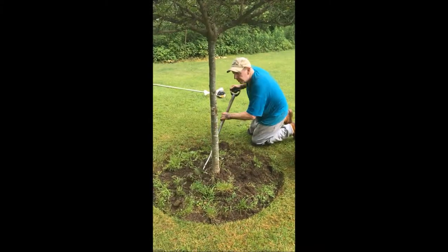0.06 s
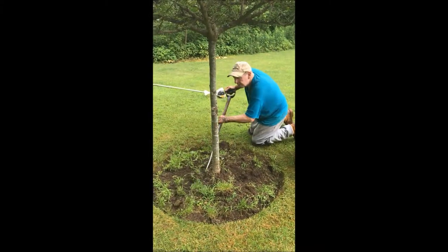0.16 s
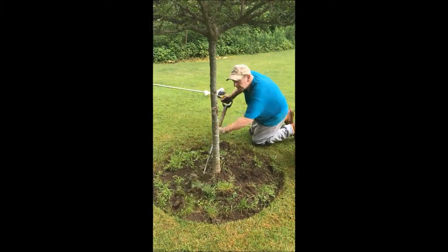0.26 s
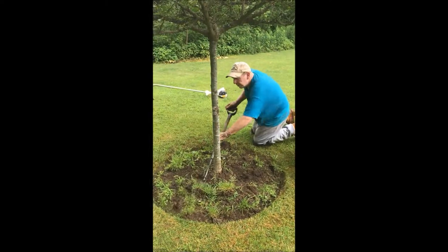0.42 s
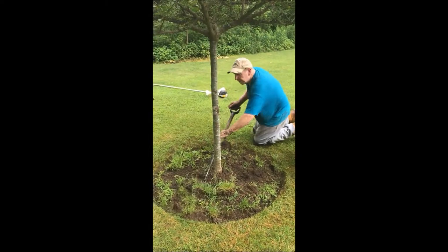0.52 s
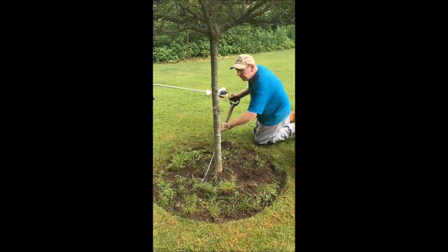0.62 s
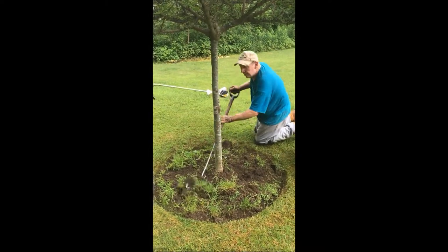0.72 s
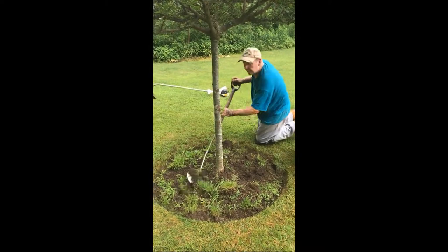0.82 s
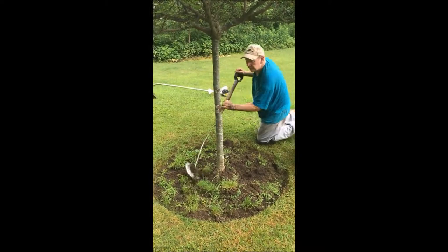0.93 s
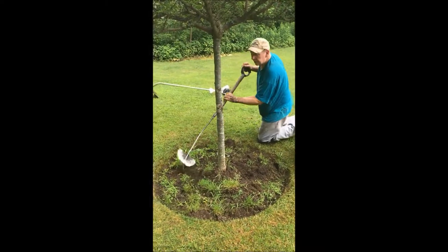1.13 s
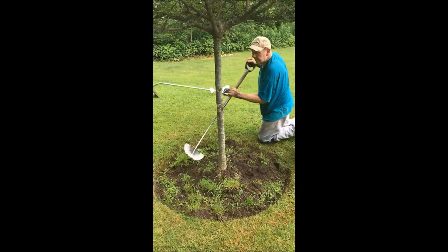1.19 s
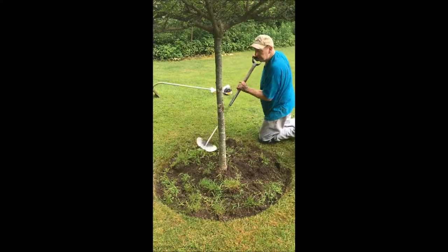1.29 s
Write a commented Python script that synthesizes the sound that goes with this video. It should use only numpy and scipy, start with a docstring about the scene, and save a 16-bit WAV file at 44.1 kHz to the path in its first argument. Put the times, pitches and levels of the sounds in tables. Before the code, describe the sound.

A long-handled steel edger jabs crunching into turf, snapping roots, then scrapes back out of soil

```python
"""Lawn edger jabbed into turf

A long-handled steel edger is jabbed into turf, then drawn out: soil grinds as trains of tiny fractures,
roots crunch in short filtered noise bursts and snap as damped knocks, the ground thuds as a sinking sine.
Grass brushes the steel, the blade rings as a set of modes, and grit ticks on it once freed.
Behind lie faint scatter, a low wavering hum of sines and outdoor air of coloured noise."""
import sys
import numpy as np
from scipy import signal
from scipy.fft import rfft, irfft
from scipy.io import wavfile
from scipy.ndimage import map_coordinates

SR = 44100
rng = np.random.default_rng(int(sys.argv[2]) if len(sys.argv) > 2 else 0)


def wrap_up_sound(samples):
    """Save the sound to the file named by the first command line argument, as 16-bit audio."""
    columns = np.atleast_2d(samples).T
    # keep every value between -1 and 1, then stretch to whole-number steps
    tamed = np.clip(columns, -1, 1)
    steps = np.round(tamed * 32767).astype(np.int16)
    wavfile.write(sys.argv[1], SR, steps)


N = 59535

# roots and clods giving way, and the low row at 0.294 s a second bounce of the ground: (time [s], rise [s],
# decay [s], level [dB], body pitch [Hz], body width [Hz], # crackle over body [dB], dull thump over body [dB])
CRUNCHES = [(0.01, 0.0033, 0.0052, -59, 1470, 1510, 10, -32),
            (0.1659, 0.00059, 0.0022, -42.5, 3600, 3000, -1.5, -26),
            (0.187, 0.0005, 0.0024, -38.5, 1500, 1500, -13, -32),
            (0.197, 0.0028, 0.00095, -34.5, 1070, 400, -10, -38),
            (0.2159, 0.0015, 0.0022, -29.5, 880, 560, 2.5, -9),
            (0.24, 0.0021, 0.003, -47, 1180, 1200, 7, -1),
            (0.256, 0.00055, 0.002, -24.5, 1050, 1100, 0, -11),
            (.259, 0.00092, 0.0048, -25, 857, 1000, -9, -20.5),
            (0.275, 0.0025, 0.0039, -28.5, 1150, 656, -7.5, -12),
            (0.278, 0.0038, 0.0033, -28.5, 4100, 1300, -7, -20),
            (0.291, 0.00062, 0.0045, -32, 1110, 890, -10, -14),
            (.294, 0.0041, 0.0078, -38.5, 170, 109, -3.5, -26),
            (0.3156, 0.00051, 0.0073, -33, 1780, 1010, -20, -7),
            (0.3243, 0.00075, 0.0021, -45, 2200, 1790, 5, -16),
            (0.337, 0.00035, 0.0079, -27, 1600, 1090, -31, -50),
            (0.341, 0.0022, 0.0048, -23, 2160, 1110, -1.5, -14),
            (0.3497, 0.00063, 0.0034, -26.5, 2400, 950, -6.5, -12),
            (0.7047, .0005, 0.0022, -41, 1134, 540, -14, -14),
            (0.745, 0.0038, 0.0032, -43, 1240, 1030, -10, -26),
            (0.766, 0.0014, 0.0048, -38, 1520, 800, -7, -44),
            (.793, 0.0035, 0.0084, -47, 535, 150, 1.5, -3),
            (.797, 0.0047, 0.0023, -38.5, 1140, 744, -1.5, -44),
            (1.172, 0.0081, 0.011, -59, 270, 130, -22, -14)]
# colour of tearing fibres: (frequency [Hz], level [dB])
CRACKLE_COLOUR = [(100, -33), (450, -15), (800, 4.5), (2500, 1.5), (4200, 0), (5300, -3.5), (9200, -4.5),
                  (10200, -16.5), (12500, -10), (16000, -18)]
# single sharp snaps of thick roots: (time [s], peak [dB], pitch [Hz], decay [s])
SNAPS = [(.2172, -21, 900, .0012), (.2571, -13, 850, .001), (.2574, -25, 5000, .001),
         (.3444, -24, 800, .0018), (.351, -15.5, 2200, 0.00067), (.7047, -30.5, 1000, .0011)]
# soil grinding on the blade going in, and coming out: (time [s], level [dB])
PUSH_LEVEL = [(.09, -69), (.135, -52), (.155, -66.5), (.175, -53), (.185, -45), (.201, -43), (.212, -48),
              (.224, -40), (.234, -49.5), (.253, -51), (.264, -30.5), (.272, -44.5), (.288, -34.5),
              (.31, -43), (.332, -43), (.354, -51), (.366, -54), (.39, -62)]
PULL_LEVEL = [(.56, -93), (.59, -67), (.635, -83), (.66, -57.5), (.695, -64.5), (.722, -52.5), (.745, -42),
              (.76, -49), (.775, -43.5), (.79, -56), (.806, -59), (.816, -68), (.826, -53.5), (.85, -79)]
# colours of the two grinds: (frequency [Hz], level [dB])
PUSH_COLOUR = [(100, -14), (300, -19), (490, -24.5), (750, 0.5), (1100, -2.5), (1600, -6), (2400, -5),
               (4400, -5), (5300, -6.5), (9000, -13.5), (16000, -17.5)]
PULL_COLOUR = [(150, -20), (450, -16), (900, -3), (1250, -7), (1500, 3), (1900, -2.5), (2250, -11.5),
               (2700, -5.5), (5000, -15), (9000, -15.5), (16000, -25)]
# grass brushing the steel: (centre time [s], Gaussian spread [s], level [dB])
BRUSHES = [(0.209, 0.0045, -41.5), (.262, 0.0024, -36.5), (0.282, 0.0051, -41), (0.587, 0.012, -57),
           (0.655, 0.032, -55), (0.733, 0.02, -56), (0.801, 0.0054, -48), (0.825, 0.0036, -48),
           (0.881, 0.016, -62), (1.025, 0.0064, -63)]
# colour of the grass: (frequency [Hz], level [dB])
GRASS_COLOUR = [(500, -29), (2000, -3.5), (4000, 3), (7000, -1.5), (9600, -0.5), (10200, -7), (12200, 0),
                (16000, -5)]
# short modes of the blade wedged in sod: (frequency [Hz], relative level [dB], t60 [s])
WEDGED_MODES = [(2290, -3, .018), (2780, -4, .018), (3680, -4, .016), (4550, 1, .012), (6900, 4, .012),
                (9080, 3, .011), (11000, 0, .011), (12500, 1, .011), (15400, 0, .013)]
# modes of the loose blade: (frequency [Hz], relative level [dB], t60 [s])
LOOSE_MODES = [(1488, -11, .05), (1728, -19, .04), (2570, -15, .35), (2730, -7, .055), (3420, -7, .045),
               (3564, -10, .08), (4231, -10, .08), (4600, -7, .09), (5630, -4, .06), (6202, -10, .045),
               (7310, -8, .055), (8130, -6, .035), (9230, -7, .075), (9750, -1, .04), (10780, -3, .05),
               (11090, -5, .04), (11580, -6, .06), (12630, -6, .035), (13800, -10, .04)]
# grit on the free blade; the landing spot favours some modes:
# (time [s], click [dB], ring [dB], favoured pitch [Hz], distance to fall 10 dB [octaves])
TICKS = [(.823, -53, -56, 3500, .25), (.881, -68, -47, 4231, .06), (0.9357, -38.5, -44, 4800, 2),
         (0.957, -75, -48, 2570, .08), (0.9656, -55, -55, 11300, .4), (1.0148, -58, -57.5, 11100, .8),
         (1.16, -57, -57, 4500, .4), (1.26, -58.5, -75, 9000, 1)]
# colour of the clicks: (frequency [Hz], level [dB])
TICK_COLOUR = [(200, -22), (600, -3), (2000, -6.5), (4000, -1), (7000, 0.5), (9600, -2.5), (10200, -5),
               (12200, -3), (16000, -12)]
# distant hum partials: (frequency [Hz], level [dB])
HUM = [(51.5, -54), (78, -59), (129, -62), (156, -65.5), (206, -73), (229, -71.5)]
# colour of outdoor air: (frequency [Hz], level [dB])
AIR_COLOUR = [(20, -27), (35, -28), (50, -1.5), (85, 1.5), (130, -4.5), (230, -8.5), (340, -14), (500, -21),
              (900, -16.5), (1500, -19.5), (3000, -23.5), (6000, -29.5), (11000, -34), (16000, -34.5)]

THUMP_HZ, THUMP_WIDTH_HZ = 316, 368
RESNAP_S = 0.0007  # mean lag of a fibre's second snap
GRAINS_PER_S, GRAIN_SPREAD_DB, GRAIN_Q = 700, 4, 3.3  # in each pitch band
LOOSENS_S, WEDGED_RING_DB, LOOSE_RING_DB = 0.4, -15, -6.5
TICK_DECAY_S = 0.0026
THUD_S, THUD_DB, THUD_RISE_S, THUD_DECAY_S = 0.2574, -30.5, 0.00083, 0.033
THUD_START_HZ, THUD_END_HZ, THUD_SAG_S = 280, 58, 0.01014
GARDEN_DB, GARDEN_START_S, GARDEN_RISE_S, GARDEN_DECAY_S = -28.5, 0.0065, 0.013, 0.22
HUM_WAVER_DB, HUM_WAVER_HZ, HUM_DRIFT_RAD, HUM_DRIFT_HZ = 3, 8.77, 0.99, 6.88
AIR_DB, AIR_SPLIT_HZ, AIR_FADE_DB_PER_S = -56, 500, 3.5
TOP_HZ = 15900


def crunches():
    """Each root tears in a cluster of fractures: body and dull thump in the sod, bright doubled crackle."""
    body, thump, crackle = 0, 0, 0
    sod, fibres = rng.standard_normal(N), grains()
    dull = resonate(rng.standard_normal(N), THUMP_HZ, THUMP_WIDTH_HZ)
    lags_s = RESNAP_S * (0.5 + rng.random(N))
    for (start, rise, decay, db, hz, width, crackle_db, thump_db), lag_s in zip(CRUNCHES, lags_s):
        env = undb(db) * burst(start, rise, decay)
        body = body + fill(resonate(env * sod, hz, width), env)
        thump = thump + undb(thump_db) * fill(env * dull, env)
        snap = env * fibres
        resnap = np.roll(snap, int(lag_s * SR))
        crackle = crackle + undb(crackle_db) * fill(snap - resnap, env)
    return body + thump + colour(crackle, CRACKLE_COLOUR)


def snaps():
    """A thick root parts at once: one abrupt, heavily damped knock."""
    out = 0
    for start, db, hz, decay in SNAPS:
        knock = np.cos(2 * np.pi * hz * (times() - start))
        out = out + undb(db) * burst(start, 2 / SR, decay) * knock
    return out


def grind(curve, tone, slip_hz, slip_db):
    """Soil grains slide past the blade in uneven slips."""
    s, db = np.array(curve).T
    level_db = np.interp(times(), s, db, left=-120, right=-120)
    env = undb(level_db + slip_db * walk(slip_hz))
    return colour(env * grains(), tone)


def grass():
    """Blades of grass swish over the steel in Gaussian swells of tiny fractures."""
    env = 0
    for centre, spread, db in BRUSHES:
        env = env + undb(db) * np.exp(-((times() - centre) / spread) ** 2 / 2)
    return colour(env * grains(), GRASS_COLOUR)


def blade(rub):
    """The steel rings with whatever rubs it: briefly while wedged, longer once loose."""
    loose = times() > LOOSENS_S
    wedged_ring = convolve_unit(rub * ~loose, ring(WEDGED_MODES))
    loose_ring = convolve_unit(rub * loose, ring(LOOSE_MODES))
    return undb(WEDGED_RING_DB) * wedged_ring + undb(LOOSE_RING_DB) * loose_ring


def ticks():
    """Grit clicks on the lifted blade, which rings freely and a little differently each time."""
    env, ringing = 0, 0
    for start, click_db, ring_db, favoured_hz, octaves in TICKS:
        env = env + undb(click_db) * burst(start, 1 / SR, TICK_DECAY_S)
        modes = []
        for hz, db, t60 in LOOSE_MODES:
            loss_db = 10 * abs(np.log2(hz / favoured_hz)) / octaves
            modes.append((hz, db - loss_db, t60))
        ringing = ringing + undb(ring_db) * np.pad(ring(modes), (int(start * SR), N))[:N]
    return colour(env * rng.standard_normal(N), TICK_COLOUR) + ringing


def thud():
    """The ground takes the blow; its pitch sinks exponentially as the blade slows."""
    age = np.maximum(times() - THUD_S, 0)
    sag = (THUD_START_HZ - THUD_END_HZ) * THUD_SAG_S * (1 - np.exp(-age / THUD_SAG_S))
    turns = THUD_END_HZ * age + sag  # integral of the sinking pitch
    return undb(THUD_DB) * burst(THUD_S, THUD_RISE_S, THUD_DECAY_S) * np.sin(2 * np.pi * turns)


def garden(x):
    """Faint scatter from trees and hedge: convolution with a decaying noise tail."""
    tail = burst(GARDEN_START_S, GARDEN_RISE_S, GARDEN_DECAY_S) * rng.standard_normal(N)
    return undb(GARDEN_DB) * convolve_unit(x, tail)


def hum():
    """Distant low partials, each wavering in level and phase."""
    out = 0
    for hz, db in HUM:
        level = undb(db + HUM_WAVER_DB * walk(HUM_WAVER_HZ))
        phase = 2 * np.pi * hz * times() + HUM_DRIFT_RAD * walk(HUM_DRIFT_HZ)
        out = out + level * unit(np.sin(phase))
    return out


def air():
    """Outdoor air: coloured noise whose hiss slowly eases while the low part holds."""
    t = times()
    noise = undb(AIR_DB) * unit(colour(rng.standard_normal(N), AIR_COLOUR))
    low = signal.sosfiltfilt(signal.butter(2, AIR_SPLIT_HZ, fs=SR, output="sos"), noise)
    hiss = noise - low
    return low + hiss * undb(-AIR_FADE_DB_PER_S * (t - t.mean()))


def grains():
    """Tiny fractures of uneven size, each a few cycles at its own pitch; rms 1."""
    out = 0
    for hz in np.geomspace(200, 16000, 22):
        chance, size, sign = rng.random(N), rng.exponential(size=N), rng.choice([-1, 1], N)
        hits = chance < GRAINS_PER_S / SR
        pulses = np.zeros(N)
        pulses[hits] = sign[hits] * undb(GRAIN_SPREAD_DB * np.minimum(size[hits], 3))
        out = out + signal.lfilter(*signal.iirpeak(hz, GRAIN_Q, fs=SR), pulses)
    return unit(out)


def ring(modes):
    """Response of a set of modes to one sharp blow."""
    t = times()[:N // 4]
    out = 0
    for hz, db, t60 in modes:
        out = out + undb(db) * np.cos(2 * np.pi * hz * t) * np.exp(-np.log(1000) * t / t60)
    return out


def burst(start, rise, decay):
    """Straight rise, exponential fall."""
    age = times() - start
    return np.clip(age / rise, 0, 1) * np.exp(-np.clip((age - rise) / decay, 0, 20))


def walk(hz):
    """Smooth random curve of rms 1 through hz knots per second."""
    knots = rng.standard_normal(N)
    return unit(map_coordinates(knots, [times() * hz], order=2, mode="mirror"))


def colour(x, points):
    """Causal minimum-phase filter through (Hz, dB) points that keeps the power of white noise."""
    hz, db = np.array(points).T
    bins_hz = np.arange(N + 1) * SR / (2 * N)
    gain = unit(undb(np.interp(np.log(bins_hz + 1), np.log(hz), db)))
    cepstrum = irfft(np.log(gain))
    cepstrum[1:N] *= 2  # fold to minimum phase
    cepstrum[N + 1:] = 0
    return irfft(rfft(x, 2 * N) * np.exp(rfft(cepstrum)))[:N]


def resonate(x, hz, width):
    """Steep resonant band that keeps the power of white noise."""
    low = np.hypot(hz, width / 2) - width / 2  # hz is the geometric centre
    band = signal.butter(3, [low, low + width], "bandpass", fs=SR, output="sos")
    return convolve_unit(x, signal.sosfilt(band, signal.unit_impulse(2048)))


def convolve_unit(x, h):
    """Convolve with a response scaled to unit energy."""
    return signal.fftconvolve(x, h / np.linalg.norm(h))[:N]


def fill(x, env):
    """Give a sound the energy of an envelope."""
    return unit(x) * np.sqrt(np.mean(env ** 2))


def unit(x):
    """Scale to rms 1."""
    return x / np.sqrt(np.mean(x ** 2) + 1e-18)


def undb(db):
    """Decibels to gain."""
    return 10 ** (np.asarray(db) / 20)


def times():
    """Time of each sample in seconds."""
    return np.arange(N) / SR


def scene():
    """One jab and one pull of the blade over the background."""
    push = grind(PUSH_LEVEL, PUSH_COLOUR, slip_hz=252, slip_db=0.5)
    pull = grind(PULL_LEVEL, PULL_COLOUR, slip_hz=260, slip_db=2.5)
    soil = crunches() + snaps() + push + pull + grass()
    tool = soil + blade(soil) + ticks()
    return (tool + thud() + garden(tool) + hum() + air())[None]


def record(dry):
    """The recorder cuts the top: steep elliptic low-pass."""
    return signal.sosfilt(signal.ellip(10, 0.2, 70, TOP_HZ, fs=SR, output="sos"), dry)


dry = scene()
out = record(dry)
wrap_up_sound(out)
```